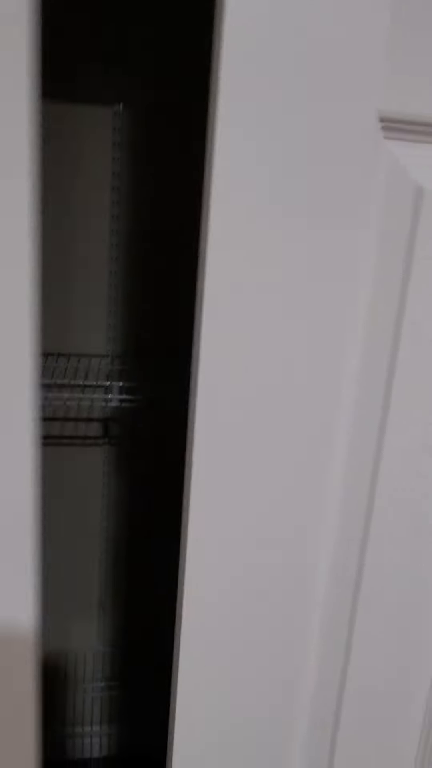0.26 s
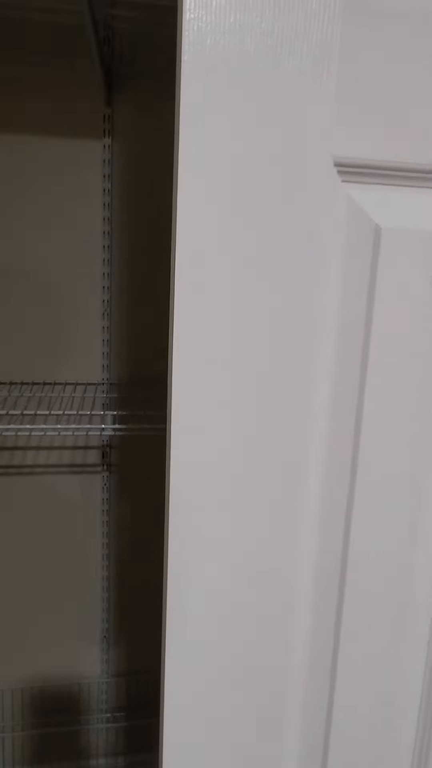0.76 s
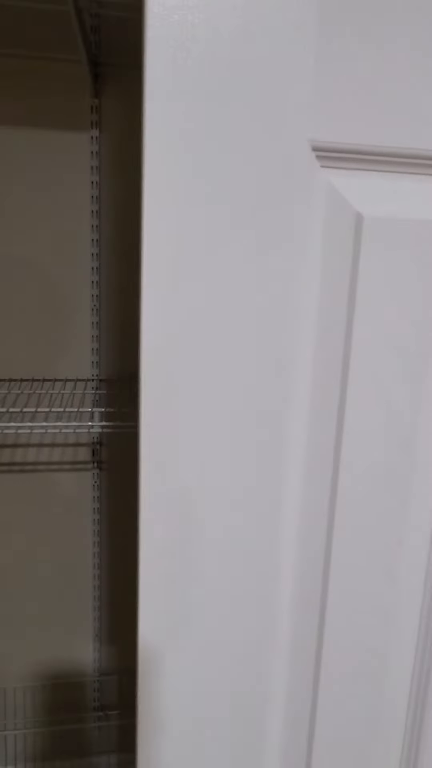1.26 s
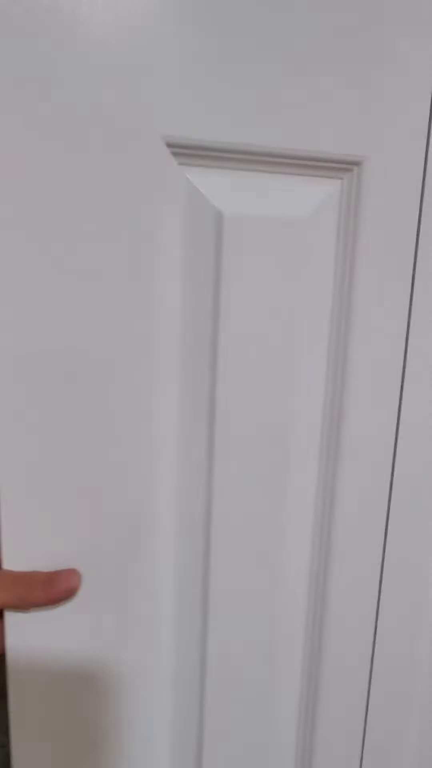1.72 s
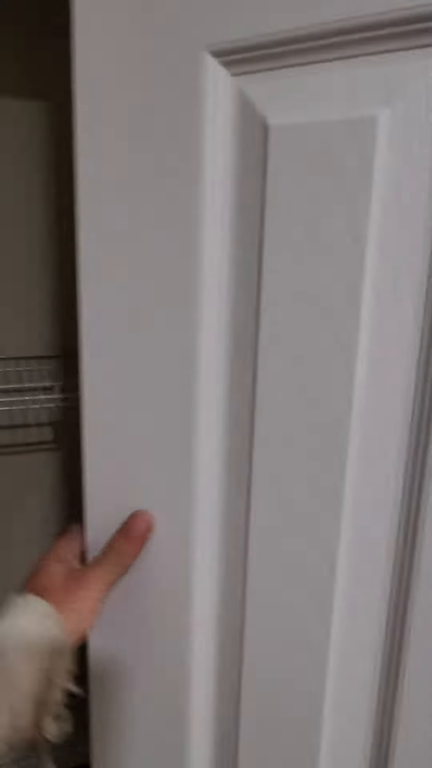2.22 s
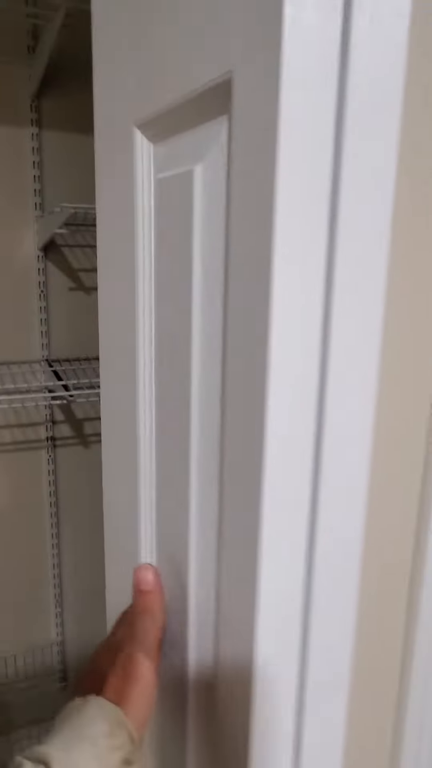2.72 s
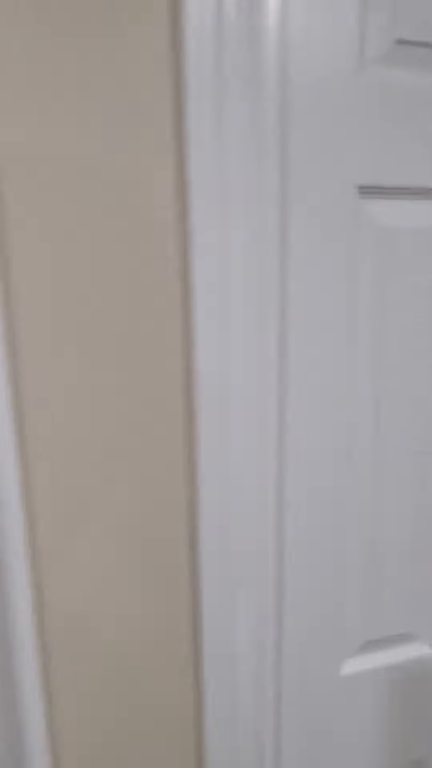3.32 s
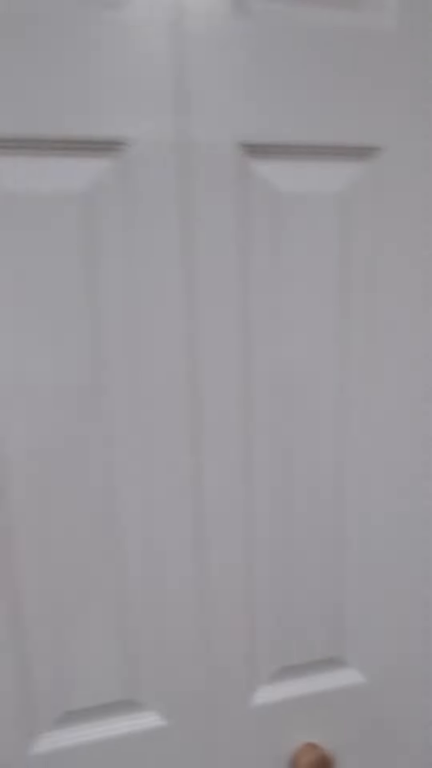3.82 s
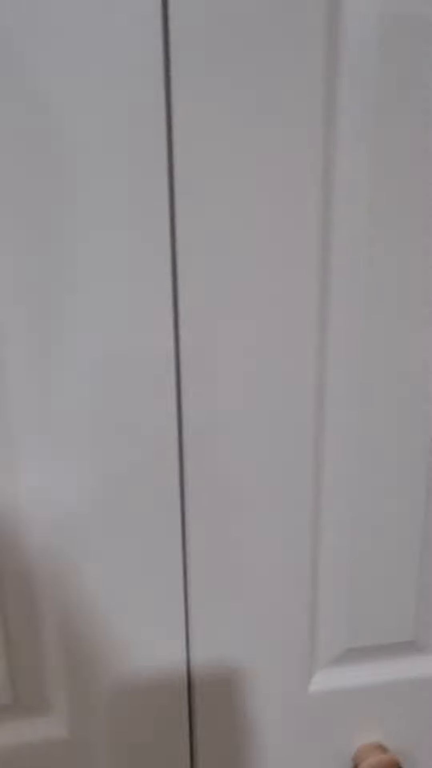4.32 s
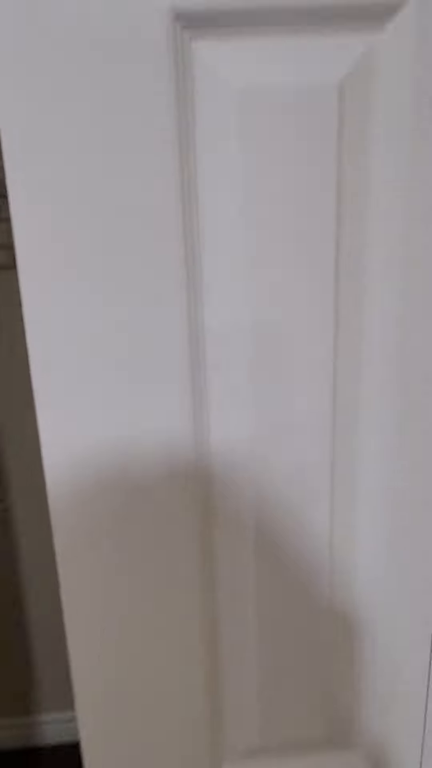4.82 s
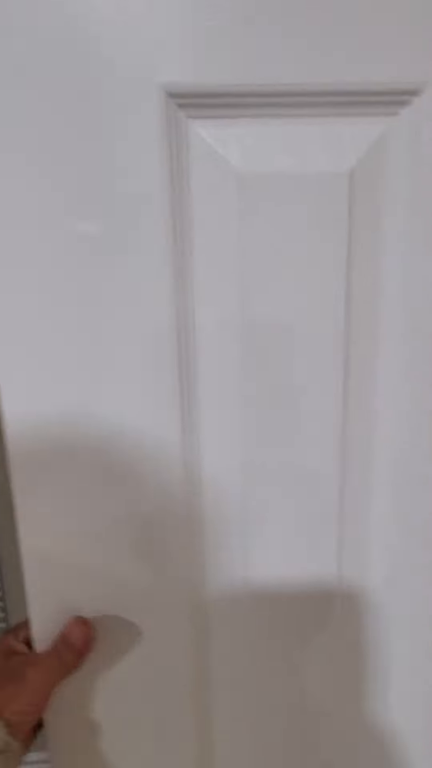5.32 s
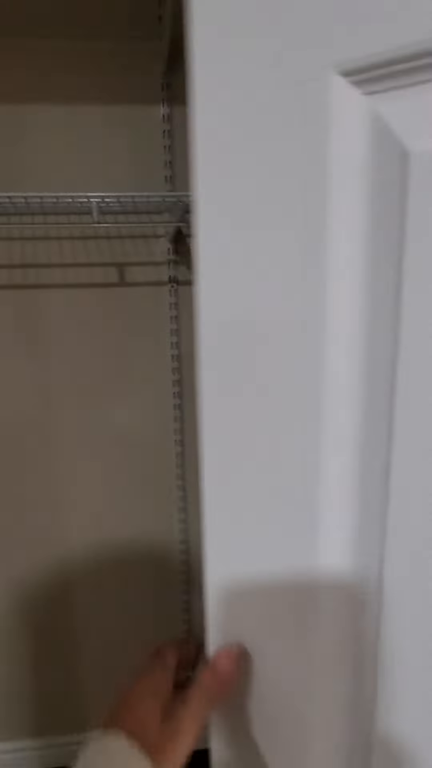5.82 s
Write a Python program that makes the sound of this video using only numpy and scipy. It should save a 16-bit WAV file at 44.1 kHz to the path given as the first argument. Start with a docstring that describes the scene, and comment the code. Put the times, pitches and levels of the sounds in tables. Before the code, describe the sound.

Indoors, close to hollow folding doors, in a hard room with echoes of about a second and a faint low hush. At 0 s a small thump and a thin, falling squeak, then soft low groaning and creaking. At 0.96 s a hollow knock with a metallic click; around 1.6 s a strong boxy thud, the loudest knock, with several clicks until 2.1 s. Hissing friction on the track swells around 2.4 s, with a brief rasp and hum; double knock and clack at 2.8 s. At 3.12 s a very loud, bright snap, its echo fading into near quiet, one faint bump at 3.4 s. From 4.1 s another door: low thuds, clicks, a short juddering hum at 4.6 s, scraping. Sharp clacks with a groaning thump at 5.3 and 5.4 s, then growing hiss, rattles and steely rasps until the end at about 6 s.

```python
"""Hollow folding doors in an echoing room

Folding closet doors are pulled open in three pulls. Short pushes excite the damped modes of the hollow
panels; sharp contacts of pins and hinges ring the steel track, and a spring catch snaps once.
Random slips of the pin make groaning, hiss and rasps; panel hums and falling squeaks are sine tones.
Decaying noise gives the room its echoes of about a second; shaped noise gives the hush behind them."""
import sys
import numpy as np
from scipy import signal
from scipy.fft import rfft, irfft
from scipy.io import wavfile
from scipy.ndimage import uniform_filter1d

SR = 44100
rng = np.random.default_rng(int(sys.argv[2]) if len(sys.argv) > 2 else 0)


def dump_mix(stems):
    """Bounce the given channels to the path in sys.argv[1] as a 16-bit WAV at rate SR."""
    frames = np.atleast_2d(stems).T  # one column per channel
    limited = np.clip(frames, -1, 1)  # hard clip at full scale
    pcm = np.round(limited * 32767).astype(np.int16)
    wavfile.write(sys.argv[1], SR, pcm)


N = 267237
T = np.arange(N) / SR
FFT_SIZE = 2 ** 19
HZ = np.fft.rfftfreq(FFT_SIZE, 1 / SR) + 1  # one above zero, so that its logarithm exists

# All source levels hold ahead of the room and the microphone.
# blows on the panels: start_s, boom_peak_db, favoured_pitch_hz, rattle_relative_to_boom_db
KNOCKS = [(.008, -21.5, 840, -20.5), (.012, -26.5, 66, -10.5), (.045, -49, 810, -17), (.09, -45, 810, -6),
          (.961, -18.5, 165, -3.5), (1.04, -20, 165, -18), (1.591, -26.5, 80, -4), (1.615, -5, 278, -22),
          (1.675, -24.5, 273, -2), (2.053, -27.5, 63, -19), (2.137, -21.5, 186, -7),
          (2.762, -22.5, 284, -0.5), (2.799, -17.5, 176.5, -3), (3.427, -33, 253, 7.5),
          (4.077, -38, 500, 3), (4.157, -28, 137, -22), (4.224, -27, 64, -31), (4.269, -23, 67.4, 0),
          (4.439, -20, 48, -19), (4.77, -36.5, 450, 13), (5.216, -36.5, 397, 5), (5.24, -25, 75, -34),
          (5.329, -22.5, 163, -7.5), (5.421, -22, 64, -14), (5.528, -30.5, 350, 8), (5.7, -29, 167, -7),
          (5.744, -30.5, 404, 3), (5.885, -32, 70, -15)]
# contacts of pins and hinges in the track:
# start_s, track_peak_db, favoured_pitch_hz, treble_share_db, room_send_db
TICKS = [(0.9607, -20.5, 4320, -33, 12), (1.1485, -38.5, 3980, 8.5, 8.5), (1.5058, -53, 3440, -48, 19.5),
         (1.593, -43, 2500, -3, 23), (1.6218, -22, 3560, -6.5, 5), (1.6741, -23, 2500, -22, 11),
         (1.7088, -23, 6900, 5.5, 14), (1.8912, -27.5, 4180, -28, 11.5), (2.0793, -27.5, 5200, -10, 16),
         (2.135, -23, 5060, -3, 15), (2.4137, -34.5, 4600, -1, 22.5), (2.7641, -23, 6740, 0, 8),
         (2.7968, -18.5, 3550, -9, 11.5), (4.1512, -52.5, 3340, 8, 21), (4.2778, -30, 3660, -0.5, 13.5),
         (4.4087, -21, 3600, -17, 7.5), (4.6892, -39.5, 3560, 4.5, 20), (4.7386, -42.5, 5000, -35, 24.5),
         (5.0487, -47, 3900, 11, 2), (5.217, -30, 3420, -22, 10.5), (5.3174, -15.5, 4800, -3.5, 5),
         (5.418, -14, 3900, -3, 5.5), (5.6697, -33, 4450, -2.5, 23.5), (5.742, -31, 4800, 5, 16.5),
         (5.8931, -29.5, 3800, 2.5, 15.5)]
# modes of the hollow panels: pitch_hz, gain_db, t60_s (for free ringing)
PANEL_MODES = [(48, -3.5, 0.72), (64, -17, 0.7), (80.2, -5.5, 0.6), (102.3, -6, 0.5), (130, -6, 0.28),
               (163, -2.5, 0.53), (180, 1.5, 0.21), (207.6, -6.5, 0.74), (237.7, 1.5, 0.29), (278, 4, 0.14),
               (358.6, 9, 0.15), (404, 4.5, 0.34), (450, -1, 0.28), (490.3, -18.5, 0.83), (576, 4, 0.11),
               (683, 8.5, .08), (776, 8, 0.062), (857, 6, 0.064), (1100, -38, 0.088)]
# resonances of the steel track: centre_hz, width_hz (of one filter pass), gain_db
TRACK_BANDS = [(2270, 2500, 9), (3496, 590, 3.5), (3900, 330, 2), (4020, 1300, 3), (4290, 340, 3.5),
               (4730, 340, 13.5), (5330, 920, 15), (5940, 370, 12.5), (6500, 940, 12), (7450, 550, -28)]
# lower scraping resonances: centre_hz, width_hz, gain_db
SCRAPE_BANDS = [(737, 1180, 7.5), (1380, 250, -4), (1687, 255, -9.5)]
# treble resonances of the contact: centre_hz, width_hz, gain_db
TREBLE_BANDS = [(9320, 1300, -1.3), (10800, 2000, -9), (15440, 2500, -0.5)]
# reverberation: centre_hz, t60_s, level_db
ROOM = [(60, 1.17, -6.5), (240, 0.67, -5), (700, 1.12, 4), (1910, 1.135, 4.5), (4320, 0.94, 1),
        (8160, 1.44, -1), (15000, 0.27, -3)]
# colour of the background hush: frequency_hz, relative_density_db
HUSH_COLOUR = [(18, -55), (30, -20), (75, 1.5), (280, -19), (486, -27), (1760, -9), (2610, -16.5),
               (12000, -23), (16000, -19.5)]
# balance of the two microphone ports: frequency_hz, left_minus_right_db
LEFT_BIAS = [(60, -1), (600, 1.5), (1200, -3), (2500, 2.5), (8000, 2), (13000, 6.5)]
# response of the microphone: frequency_hz, gain_db
MICROPHONE = [(20, -9), (35, -24.5), (55, 2.5), (2200, -5), (2800, -6.5), (3200, -5.5), (7000, -9),
              (8500, -11.5), (12000, -6)]
# falling squeaks: start_s, length_s, fundamental_hz (itself silent), held_s, fall_hz_per_s, level_db
SQUEAKS = [(-.02, 0.13, 3080, 0.076, 7800, -40), (.11, 0.041, 3200, .005, 18000, -50)]
# sounding overtones of a squeak: multiple, relative_level_db
OVERTONES = [(3, -11.5), (4, -13), (5, -3)]
# snap of the spring catch: start_s, peak_db, room_send_db
CATCH_SNAP = (3.1192, -2.24, 11.5)
# colour of the snap: frequency_hz, gain_db
CATCH_COLOUR = [(300, -17.5), (900, -19), (2300, -20), (2900, -12.5), (3280, -2.5), (3600, -5), (4100, -10),
                (4900, -9), (5600, -5.5), (6300, -13), (7700, -13), (10000, -19.5), (12000, -21.5),
                (13800, -22)]
# three pulls on the doors: start_s, end_s
PULLS = [(0, .95), (.97, 3.11), (4.08, 6.06)]
# load on the panels, one list a pull: time_s, sway_db, groan_db, groan_pitch_hz
LOAD = [
    [(0.0, -43, -53, 190), (0.118, -53, -49.5, 180), (0.296, -38.5, -43.5, 177), (0.382, -43, -42.5, 224),
     (0.42, -31, -39.5, 177.5), (0.464, -47, -39, 218), (0.624, -42, -42, 273), (0.75, -57, -43.5, 206),
     (0.95, -63, -48.5, 264)],
    [(0.97, -37, -30, 163), (1.21, -61, -40, 244), (1.4, -71, -76.5, 166), (1.65, -59, -61, 284),
     (1.77, -30, -57.5, 276), (1.88, -38, -42, 247), (2.72, -68, -43.5, 314), (2.85, -28, -29.5, 180),
     (3.11, -50, -47, 261)],
    [(4.08, -67, -46, 234), (4.338, -36.5, -34, 187), (4.46, -50, -35, 175), (4.872, -55, -41.5, 266),
     (5.088, -64, -43, 181), (5.39, -22, -29.5, 180), (5.518, -46.5, -41.5, 230),
     (6.012, -48.5, -39.5, 205), (6.06, -71, -54, 270)],
]
# pin rubbing along the track, one list a pull: time_s, hiss_db, treble_share_db, scrape_share_db
RUB = [
    [(0.0, -55.5, -1, 22.5), (0.01, -59.5, 8, 19.5), (0.142, -65.5, 8, 10), (0.34, -63.5, -23, 6),
     (0.404, -63, -20, 12), (0.602, -64.5, -6, 14), (0.762, -68.5, -16, 11.5), (0.798, -67.5, -10, 12),
     (0.95, -73, -23, 1)],
    [(0.97, -75, 6, 25), (1.1, -65.5, -4, 15), (1.57, -81, -7, 25), (1.62, -62, 18, 14.5),
     (1.78, -52, 7, 2.5), (1.89, -50.5, -1, 6), (2.42, -42.5, 2.5, 0.5), (2.9, -51, -1.5, 6.5),
     (3.11, -61, -24, 10)],
    [(4.08, -74, 7, 17), (4.168, -65, 13, 18.5), (4.432, -48.5, -0.5, -0.5), (4.658, -55, -14, 4.5),
     (4.784, -50, 5, 8.5), (5.004, -62, -7, -2.5), (5.192, -54.5, 7, 9), (5.528, -43, -3.5, -18),
     (6.06, -37, -6, -13.5)],
]
# swells of one panel tone: middle_s, length_s, from_hz, to_hz, peak_db
HUMS = [(1.37, 0.19, 60, 58.4, -38), (2.278, 0.13, 401, 401, -34.5), (2.675, 0.1, 76, 76, -35.5),
        (4.568, 0.047, 200.4, 215, -27), (4.631, 0.076, 200, 215, -21.5), (4.686, 0.079, 217.1, 219, -23.5)]
# rasps of the pin on the steel: start_s, length_s, favoured_pitch_hz, drive_db
RASPS = [(2.235, .045, 4800, -40), (5.67, 0.044, 4300, -40), (5.736, 0.036, 3560, -41),
         (5.83, 0.03, 3560, -44), (5.885, 0.07, 3560, -31), (5.982, .075, 3800, -43)]
# narrow track modes in a rasp: pitch_hz, gain_db, t60_s
RASP_MODES = [(3560, -1, 0.099), (4300, 2, .07), (4800, -12, .05), (5330, -13, .06)]

# contact time of a 100 Hz blow; higher blows are shorter by this power of pitch
CONTACT_MS, CONTACT_SLOPE = 1.13, 0.49
# share of the scraping resonances in a tick; mean and spread of its left-minus-right level
TICK_LOW_DB, TICK_LEFT_DB, TICK_PAN_SPREAD_DB = -19, 3, 3.5
# tails after a blow and a tick: relative level and time constant of the amplitude
SHUDDER_DB, SHUDDER_S = -13, 0.14
SKID_DB, SKID_S = -18, .014
# pitches favoured by sway and hiss; wander of the hiss in octaves rms
SWAY_HZ, HISS_HZ, HISS_WANDER = 75, 3940, 0.062
PATCHY_DB, PATCHES_PER_S = 3, 25  # the rubbing catches and lets go
RING_OUT_DB_S = 58
HUSH_DB = -63
PORTS_APART_HZ = 650  # below this the two ports hear nearly the same
TOP_HZ = 15900


def knocks():
    """Modal excitation: a short push drives the panel modes, loose edges rattle; gives boom and rattle."""
    boom, rattle = np.zeros(N), np.zeros(N)
    t = np.arange(SR // 2) / SR
    luck = rng.standard_normal((len(KNOCKS), len(PANEL_MODES)))
    noises = rng.standard_normal((len(KNOCKS), len(t)))
    rattle_bands = SCRAPE_BANDS + [(440, 400, 4.2)]
    for (start, db, hz, rattle_db), mode_signs, noise in zip(KNOCKS, np.sign(luck), noises):
        contact_ms = CONTACT_MS * (hz / 100) ** -CONTACT_SLOPE
        push = np.exp(-.5 * ((t * 1000 - 2 * contact_ms) / (contact_ms / 2)) ** 2)
        blow = 0
        # where the blow lands decides which modes answer
        for (mode_hz, gain_db, t60), sign in zip(PANEL_MODES, mode_signs):
            gain = sign * undb(gain_db) * favour(mode_hz, hz, 39.0, 0.5)
            blow = blow + gain * ring(push, mode_hz, t60)
        chatter = (t == 0) + 0.26 * noise * np.exp(-t / 0.0035)
        tap = bands(bands(chatter, rattle_bands), [(784, 3300, 0)])
        i = int(start * SR)
        boom[i:i + len(t)] += (undb(db) * blow / np.abs(blow).max())[:N - i]
        rattle[i:i + len(t)] += (undb(db + rattle_db) * tap / np.abs(tap).max())[:N - i]
    return boom, rattle


def ticks():
    """Impulse response: a sharp contact rings the track, near surfaces scatter it; gives direct and room send."""
    direct, room_send = np.zeros((2, N)), np.zeros(N)
    t = np.arange(1500) / SR
    noises = rng.standard_normal((len(TICKS), 2, len(t)))
    pans = TICK_LEFT_DB + TICK_PAN_SPREAD_DB * rng.standard_normal(len(TICKS))
    impulse = 1. * (t == 0)
    low = bands(bands(impulse, SCRAPE_BANDS), [(1300, 2000, 0)])
    treble = bands(bands(impulse, TREBLE_BANDS), [(12000, 9000, 0)])
    for (start, db, hz, treble_db, room_db), noise, pan_db in zip(TICKS, noises, pans):
        # track resonances weaken with distance from the favoured pitch
        steel_bands = [(f, width, gain_db - 30.0 * min(abs(np.log2(f / hz)), .6))
                       for f, width, gain_db in TRACK_BANDS]
        steel = bands(bands(impulse, steel_bands), [(4500, 6000, 0)])
        crack = steel / np.abs(steel).max()
        crack = crack - undb(TICK_LOW_DB) * low / np.abs(low).max()
        crack = undb(db) * (crack - undb(treble_db) * treble / np.abs(treble).max())
        decay = np.exp(-t / 0.0047) + 0.041 * np.exp(-t / 0.013)
        scatter = impulse + 0.44 * noise * decay
        near = signal.fftconvolve(crack[None], scatter, axes=1)[:, :len(t)]
        pan = undb(pan_db / 2 * np.array([[1], [-1]]))
        i = int(start * SR)
        direct[:, i:i + len(t)] += (pan * near)[:, :N - i]
        room_send[i:i + len(t)] += (undb(room_db) * crack)[:N - i]
    return direct, room_send


def catch():
    """Minimum-phase impulse: a hard snap scattered by near surfaces; gives direct sound and room send."""
    start, db, room_db = CATCH_SNAP
    # folding the cepstrum makes a causal response with the given colour
    cepstrum = irfft(np.log(undb(along(CATCH_COLOUR, np.fft.rfftfreq(1024, 1 / SR) + 1))))
    fold = np.r_[1, 2 * np.ones(511), 1, np.zeros(511)]
    pulse = irfft(np.exp(rfft(cepstrum * fold)))
    snap = np.zeros(N)
    snap[int(start * SR):][:len(pulse)] = undb(db) * pulse / np.abs(pulse).max()
    t = np.arange(300) / SR
    scatter = (t == 0) + 0.61 * rng.standard_normal((2, len(t))) * np.exp(-t / 0.0034)
    direct = signal.fftconvolve(snap[None], scatter, axes=1)[:, :N]
    return direct, undb(room_db) * snap


def slide():
    """Friction excitation: slips shake the panels and ring the track; blows leave a shudder, ticks a skid."""
    sway_db, groan_db, groan_hz = pulled(LOAD)
    hiss_db, treble_db, scrape_db = pulled(RUB)
    shake, rub = grit(900, 0.34), grit(6000, 0.37)
    wander = uniform_filter1d(rng.standard_normal(N), size=SR // 12)
    wander = unit(uniform_filter1d(wander, size=SR // 12))
    patches = unit(uniform_filter1d(rng.standard_normal(N), size=int(SR / PATCHES_PER_S)))
    rub = rub * undb(PATCHY_DB * patches)

    # under load the panel modes are damped to 0.3 of their free ringing time
    modes = [(f, ring(shake, f, 0.3 * t60) * undb(db) / np.sqrt(t60)) for f, db, t60 in PANEL_MODES]
    sway = unit(sum(favour(f, SWAY_HZ, 5.4, 0.9) * mode for f, mode in modes[:4]))
    groan = unit(sum(favour(f, groan_hz, 12.8, 1.0) * mode for f, mode in modes[4:14]))

    hiss_hz = HISS_HZ * 2 ** (HISS_WANDER * wander)
    hiss = 0
    for peak in TRACK_BANDS:
        band = bands(bands(rub, [peak]), [(peak[0], 2 * peak[1], 0)])
        hiss = hiss + favour(peak[0], hiss_hz, 18.6, 0.54) * band
    hiss = unit(hiss)
    treble = unit(bands(bands(rub, TREBLE_BANDS), [(12050, 1730, 0)]))
    scrape = unit(bands(rub, SCRAPE_BANDS))

    # low blows leave a sway, higher ones a groan
    blows, contacts = np.array(KNOCKS), np.array(TICKS)
    is_low = blows[:, 2] < PANEL_MODES[4][0]
    sway_shudder, groan_shudder = [after(b[:, 0], b[:, 1] + SHUDDER_DB, SHUDDER_S)
                                   for b in (blows[is_low], blows[~is_low])]
    hiss_skid, treble_skid = [after(contacts[:, 0], contacts[:, 1] + share + SKID_DB, SKID_S)
                              for share in (0, contacts[:, 3])]

    # at rest before the third pull the panels ring out and the rubbing stops at once
    rest = np.clip(T - PULLS[1][1], 0, 1) * (T < PULLS[2][0])
    fade, moving = undb(-2 * RING_OUT_DB_S * rest), rest == 0
    # powers add under each root
    wood = np.sqrt(fade * undb(2 * sway_db) + sway_shudder) * sway
    wood = wood + np.sqrt(fade * undb(2 * groan_db) + groan_shudder) * groan
    steel = moving * undb(hiss_db + scrape_db) * scrape
    steel = steel + np.sqrt(moving * undb(2 * hiss_db) + hiss_skid) * hiss
    steel = steel + np.sqrt(moving * undb(2 * (hiss_db + treble_db)) + treble_skid) * treble
    return pair(*(wood + steel))


def rasp():
    """Driven resonance: coarse slips ring narrow track modes; each rasp starts at once and thins out."""
    slips = unit(grit(1600, 2.0))
    out = 0
    for hz, gain_db, t60 in RASP_MODES:
        drive = 0
        for start, length, centre, db in RASPS:
            thinning = (T >= start) * np.clip(1 - ((T - start) / length) ** 2, 0, 1)
            drive = drive + undb(db) * favour(hz, centre, 30, .4) * thinning
        even_power = np.sqrt(4 * np.log(1000) / t60 / SR)  # offsets the build-up of long modes
        out = out + undb(gain_db) * ring(drive * slips, hz, t60) * even_power
    return pair(*out)


def hum():
    """Single-mode oscillation: a panel hums in short clean swells as the pin judders."""
    out = 0
    for middle, length, from_hz, to_hz, db in HUMS:
        u = np.clip((T - middle) / length + .5, 0, 1)
        phase = 2 * np.pi * np.cumsum(from_hz + (to_hz - from_hz) * u) / SR
        out = out + undb(db) * np.sin(np.pi * u) ** 2 * np.sin(phase)
    return out


def squeak():
    """Harmonic series: a dry hinge pin whistles in overtones, holds its pitch, then falls as it slows."""
    out = 0
    for start, length, hz, held, fall, db in SQUEAKS:
        swell = undb(db) * np.sin(np.pi * np.clip((T - start) / length, 0, 1))
        pitch = hz - fall * np.clip(T - start - held, 0, length)
        phase = 2 * np.pi * np.cumsum(pitch) / SR
        out = out + swell * sum(undb(k_db) * np.sin(round(k) * phase) for k, k_db in OVERTONES)
    return out


def room(x):
    """Diffuse reverberation: dense echoes, as noise, decay exponentially at a rate set band by band."""
    t = np.arange(int(1.6 * SR)) / SR
    noise, tail = rng.standard_normal((2, len(t))), 0
    for k, hz in enumerate(40 * 2 ** np.arange(0, 9.)):  # octaves; the last reaches up to 18 kHz
        edges = [hz / 2 ** .5, hz * 2 ** .5 if hz < 8e3 else 18e3]
        band = signal.sosfilt(signal.butter(2, edges, "band", fs=SR, output="sos"), noise)
        t60 = along(ROOM, hz)
        decay = np.exp(-np.log(1000) * t / t60) * np.sqrt(2 * np.log(1000) / t60 / SR)
        # alternate signs where neighbouring bands overlap
        tail = tail + (-1) ** k * undb(along(ROOM, hz, column=2)) * band * decay
    tail = tail * np.clip(t / 0.0011, 0, 1)
    return pair(*signal.fftconvolve(x[None], tail, axes=1)[:, :N])


def stillness():
    """Stationary noise: a weighted spectrum gives the hush of the house."""
    hush = unit(shape(rng.standard_normal((2, N)), undb(along(HUSH_COLOUR, HZ))))
    return undb(HUSH_DB) * pair(*hush)


def grit(per_s, spread_db):
    """Stick-slip as a random impulse train: uneven slips of the pin on the steel, two unrelated streams."""
    slips = (rng.random((2, N)) < per_s / SR) * rng.standard_normal((2, N))
    return slips * undb(spread_db * rng.exponential(size=(2, N)))


def ring(x, hz, t60):
    """Damped oscillator: x drives one mode that falls by 60 dB in t60 seconds."""
    pole = np.exp(2j * np.pi * hz / SR - np.log(1000) / (t60 * SR))
    return signal.lfilter([1], [1, -pole], x).imag


def bands(x, peaks):
    """Parallel resonance: broad resonances side by side, their outputs summed."""
    out = 0
    for hz, width, db in peaks:
        b, a = signal.iirpeak(min(hz, SR * .45), hz / width, SR)
        out = out + undb(db) * signal.lfilter(b, a, x)
    return out


def favour(hz, centre, db_per_octave, reach):
    """Selective excitation: a mode weakens with distance from the favoured pitch, level beyond reach octaves."""
    return undb(-db_per_octave * np.minimum(np.abs(np.log2(hz / centre)), reach))


def after(times, db, decay_s):
    """Exponential decay: a power envelope jumps at each time and dies away; powers add."""
    power = np.zeros(N)
    np.add.at(power, (np.asarray(times) * SR).astype(int), undb(2 * np.asarray(db)))
    return signal.lfilter([1], [1, -np.exp(-2 / (decay_s * SR))], power)


def pulled(tables):
    """Piecewise-linear motion: columns of all pulls over time, each held until the next pull starts."""
    pull = np.searchsorted([start for start, end in PULLS], T, "right") - 1
    curves = []
    for rows in tables:
        times, *columns = np.transpose(rows)
        curves.append([np.interp(T, times, column) for column in columns])
    return np.choose(pull, curves)


def pair(mid, side):
    """Spatial coherence: long waves reach two close ports nearly alike, short ones differ."""
    side = shape(side, 1 / np.sqrt(1 + (PORTS_APART_HZ / HZ) ** 4) + undb(-15))
    return np.array([mid + side, mid - side])


def shape(x, gain):
    """Linear filtering: the spectrum of x is weighted by gain."""
    return irfft(rfft(x, FFT_SIZE) * gain)[..., :N]


def along(table, hz, column=1):
    """Logarithmic frequency scale: a column of the table is interpolated at hz."""
    return np.interp(np.log(hz), np.log([row[0] for row in table]), [row[column] for row in table])


def undb(db):
    """Decibel definition: level to amplitude ratio."""
    return 10 ** (np.asarray(db) / 20)


def unit(x):
    """Effective value: x is scaled to an rms of one."""
    return x / np.sqrt(np.mean(x ** 2))


def scene():
    """Superposition: direct sounds, their echoes and the background add linearly."""
    boom, rattle = knocks()
    crack, crack_send = ticks()
    snap, snap_send = catch()
    motion = slide() + rasp() + hum()
    send = undb(-5.0) * boom + undb(5.0) * rattle + crack_send + snap_send
    echoes = room(send + undb(-6.5) * motion.mean(0))
    return boom + rattle + crack + snap + motion + squeak() + echoes + stillness()


def record(dry):
    """Transducer response: two ports colour the sound unequally, peaks are rounded and the top is cut."""
    side = np.array([[.5], [-.5]])
    tilt = undb(along(MICROPHONE, HZ) + side * along(LEFT_BIAS, HZ))
    rounded = np.tanh(.7 * shape(dry, tilt)) / .7
    return signal.sosfilt(signal.ellip(10, .2, 60, TOP_HZ, fs=SR, output="sos"), rounded)


dry = scene()
out = record(dry)
dump_mix(out)
```